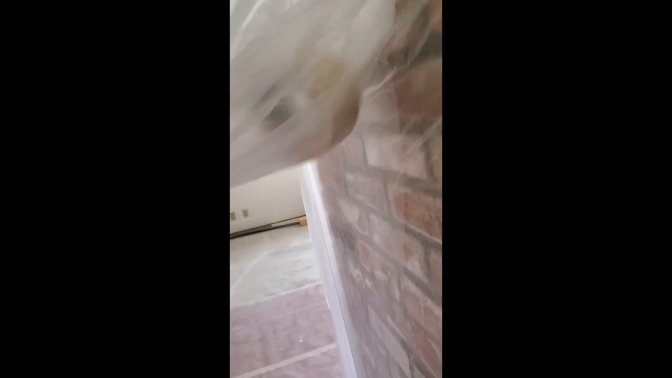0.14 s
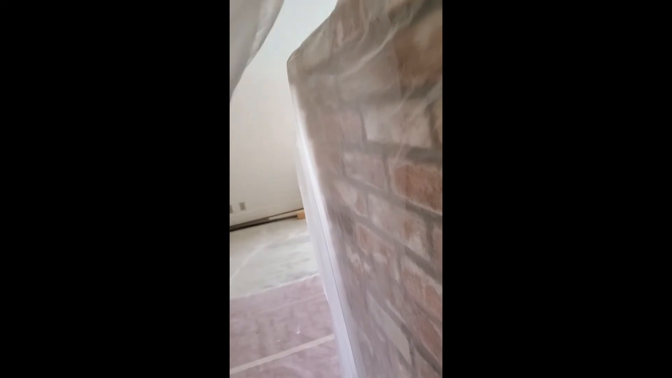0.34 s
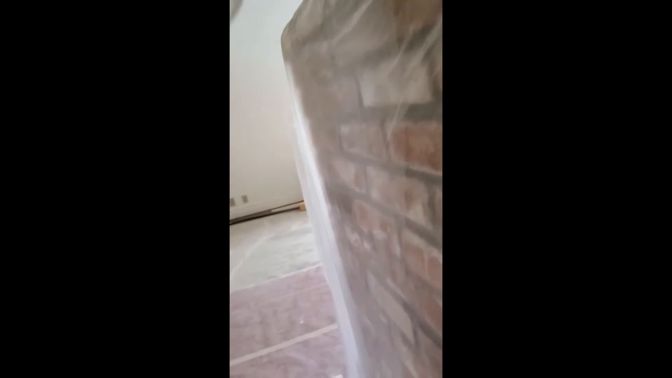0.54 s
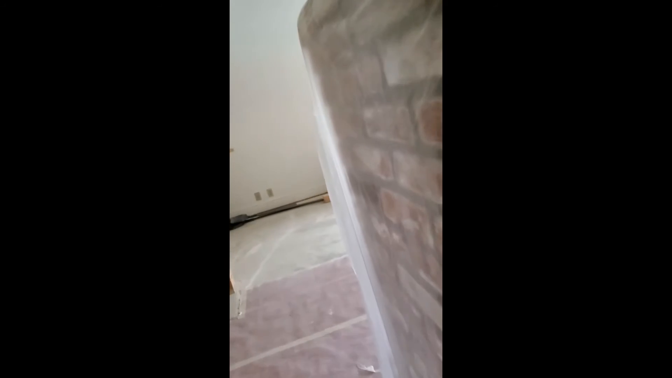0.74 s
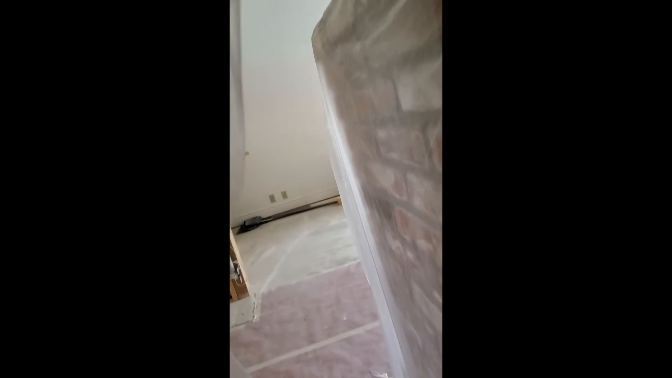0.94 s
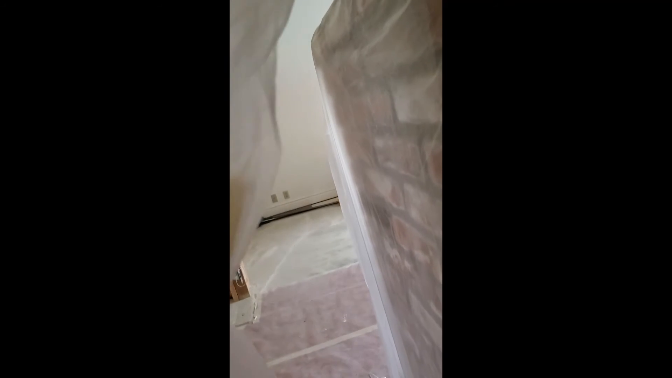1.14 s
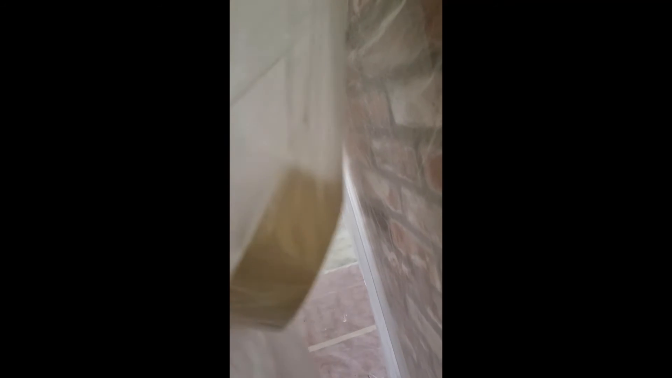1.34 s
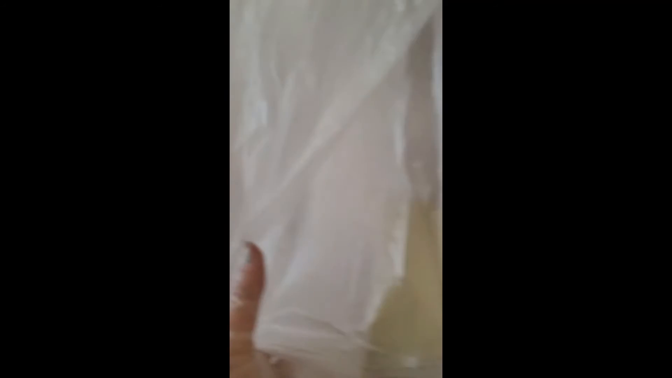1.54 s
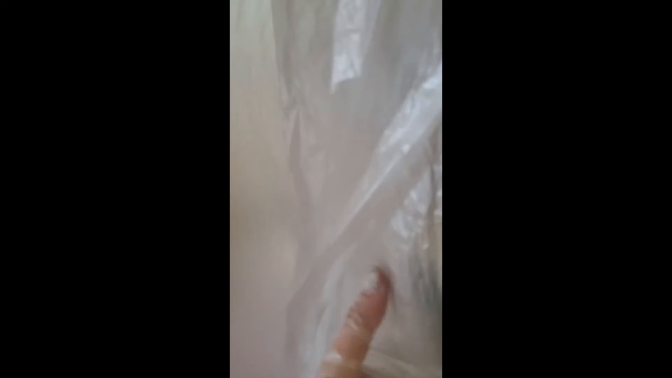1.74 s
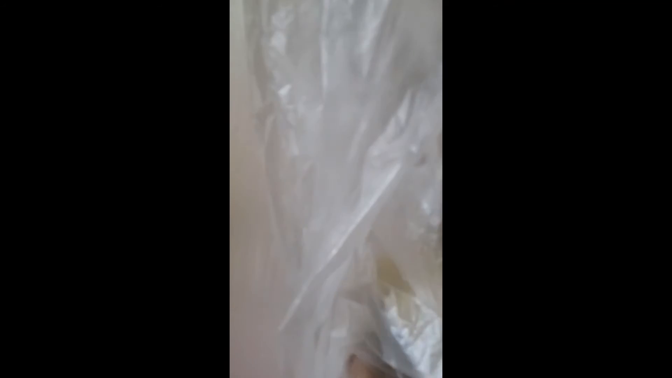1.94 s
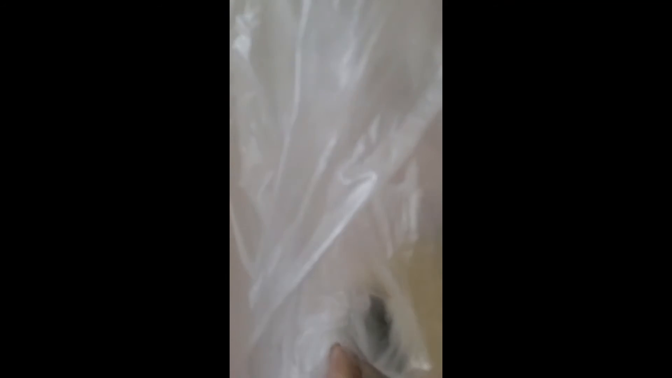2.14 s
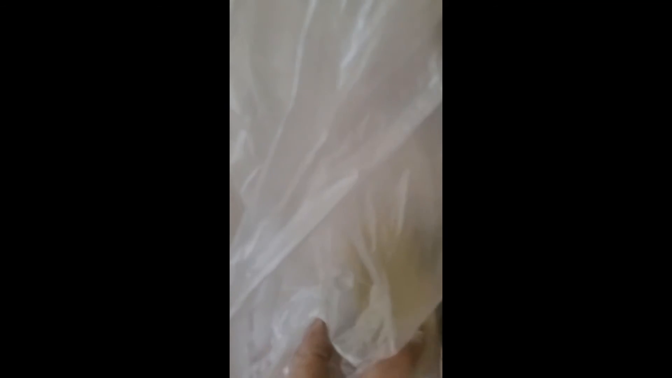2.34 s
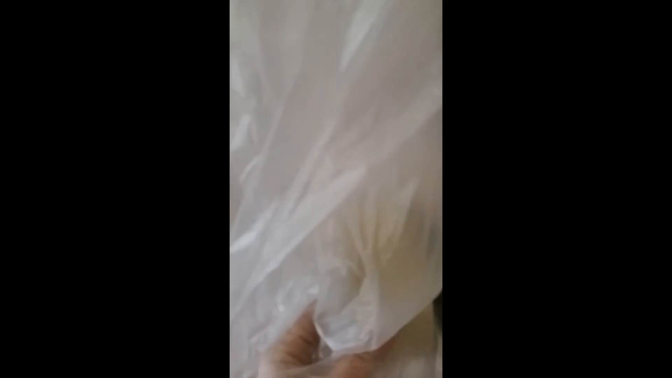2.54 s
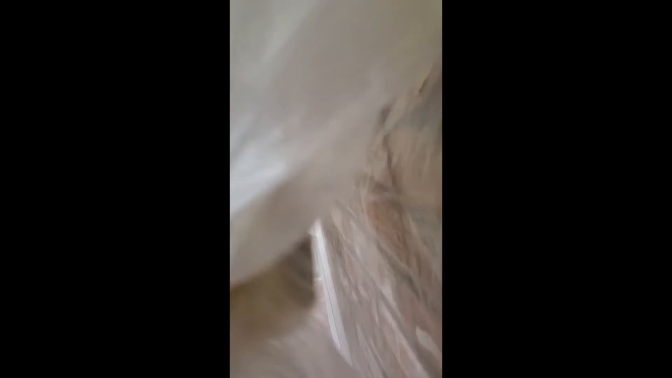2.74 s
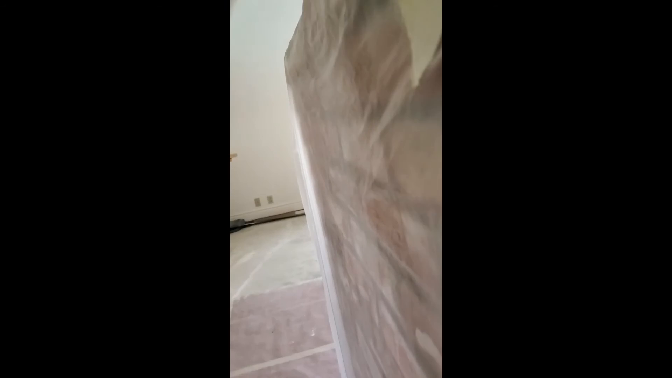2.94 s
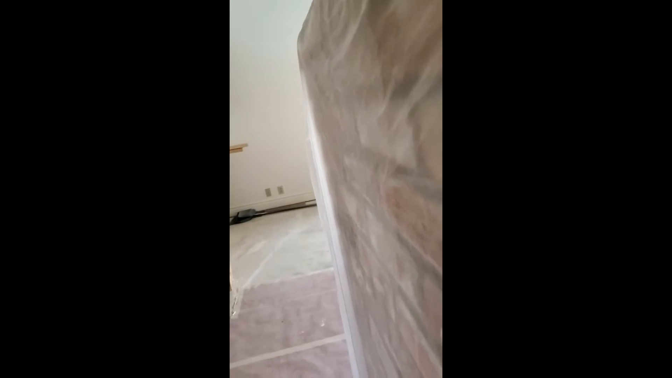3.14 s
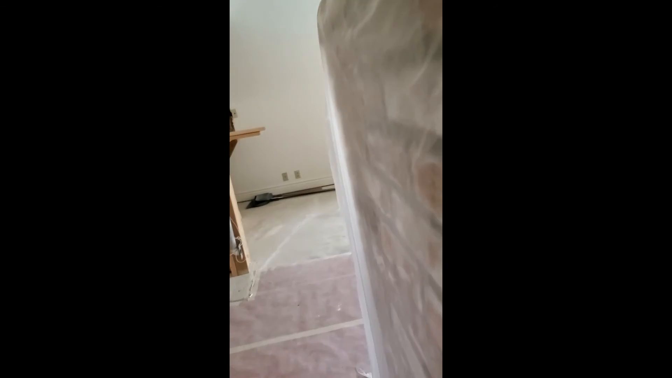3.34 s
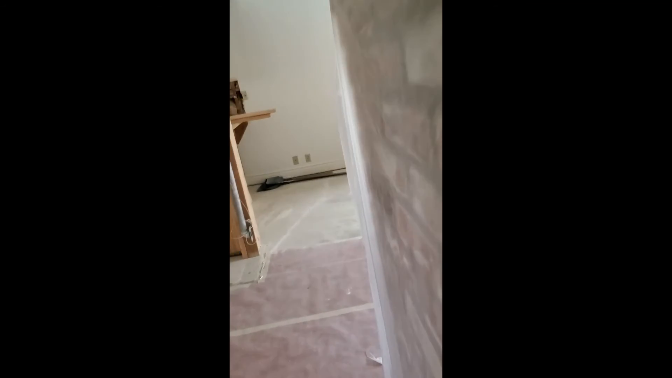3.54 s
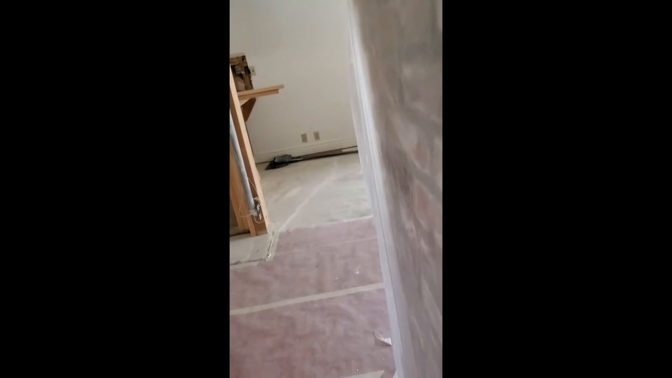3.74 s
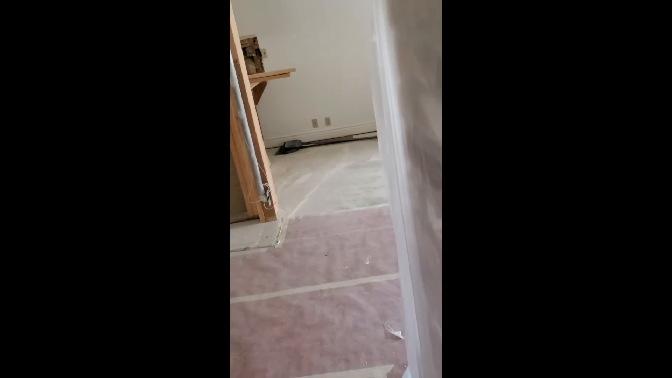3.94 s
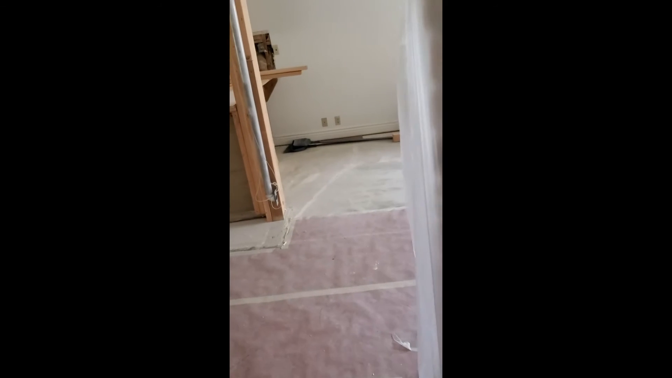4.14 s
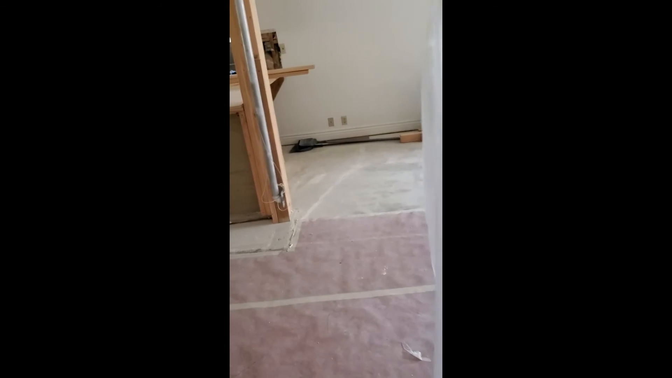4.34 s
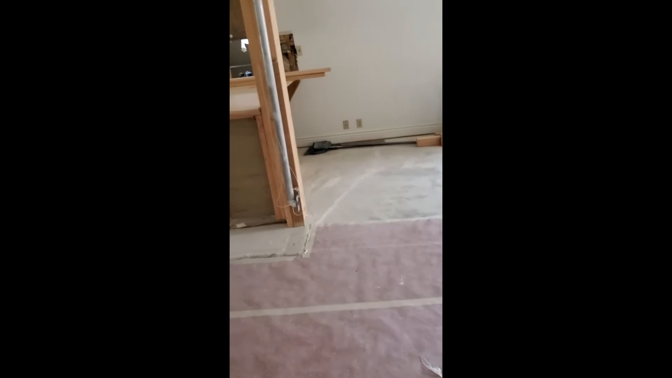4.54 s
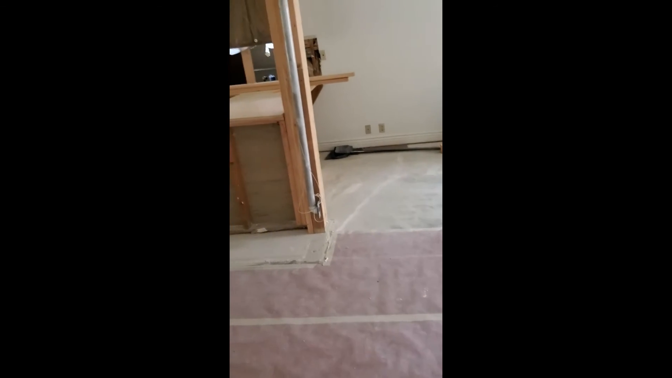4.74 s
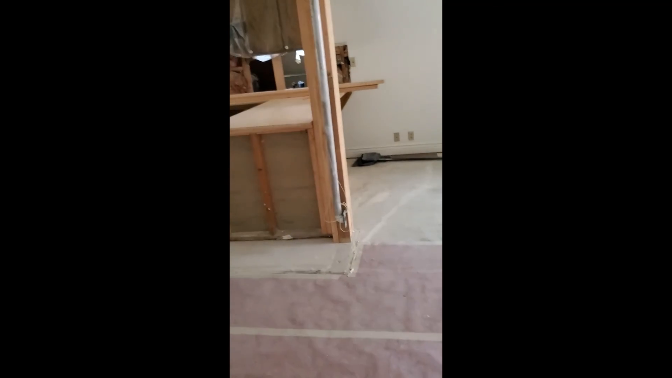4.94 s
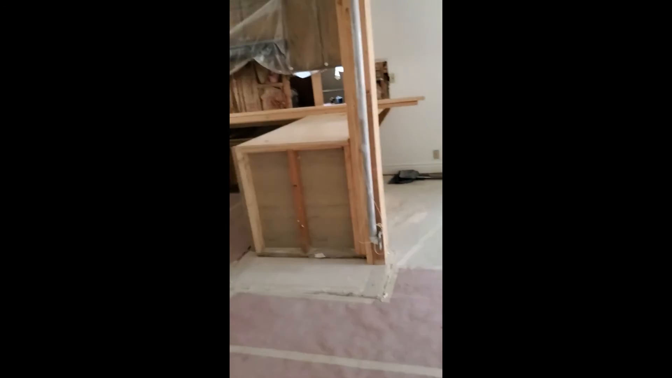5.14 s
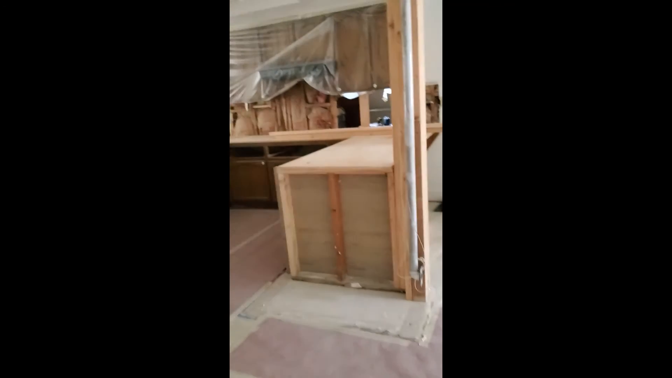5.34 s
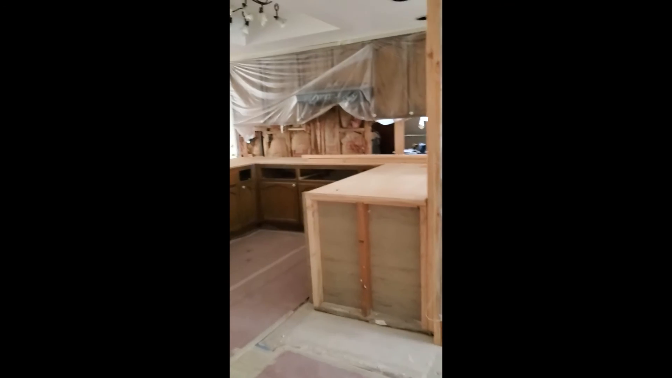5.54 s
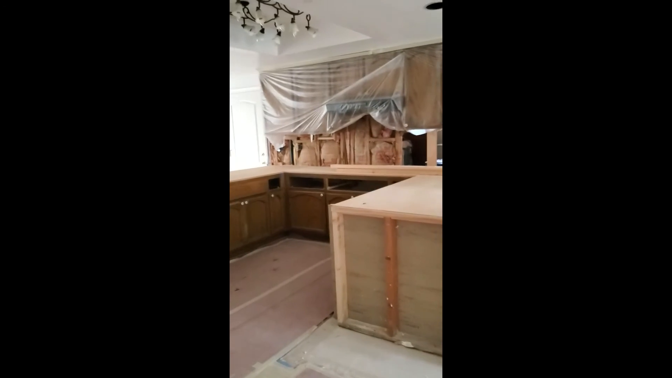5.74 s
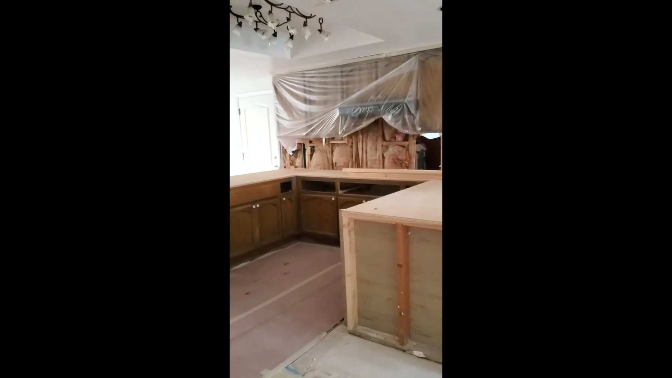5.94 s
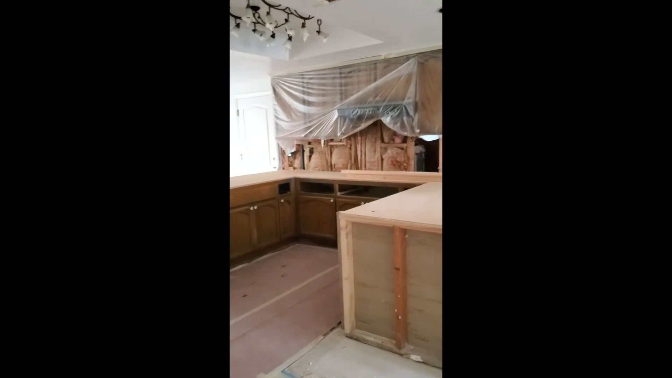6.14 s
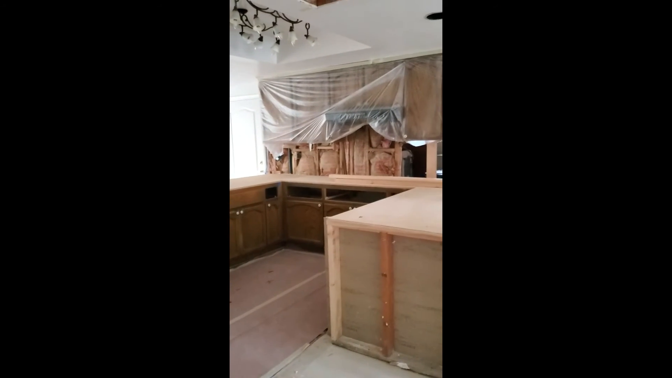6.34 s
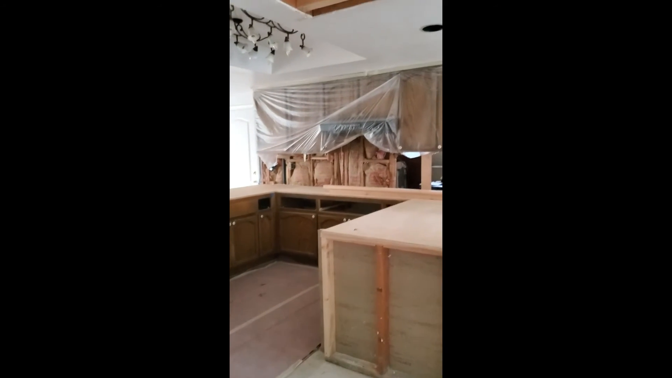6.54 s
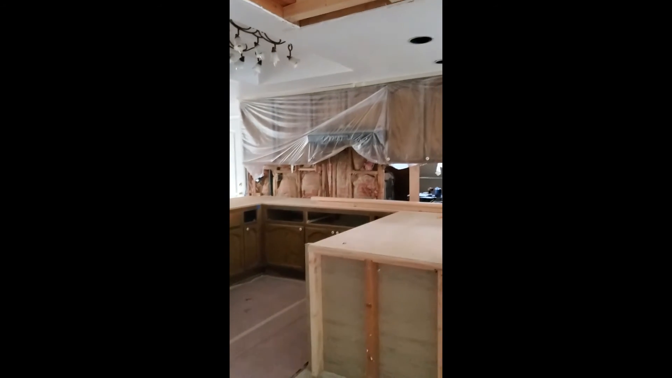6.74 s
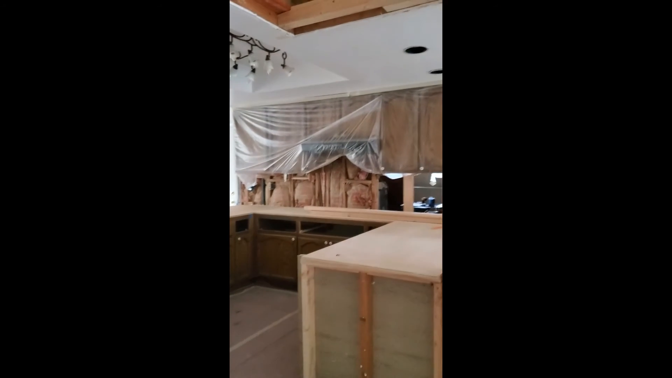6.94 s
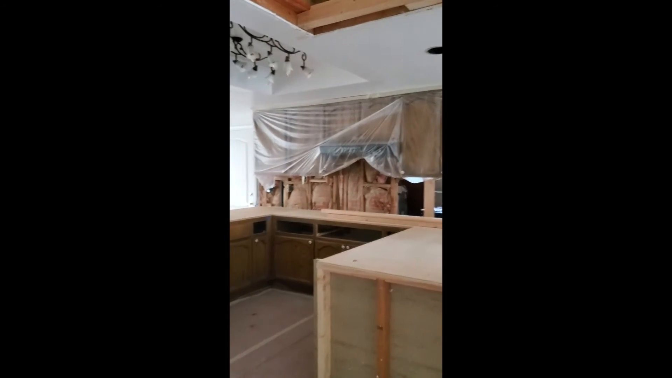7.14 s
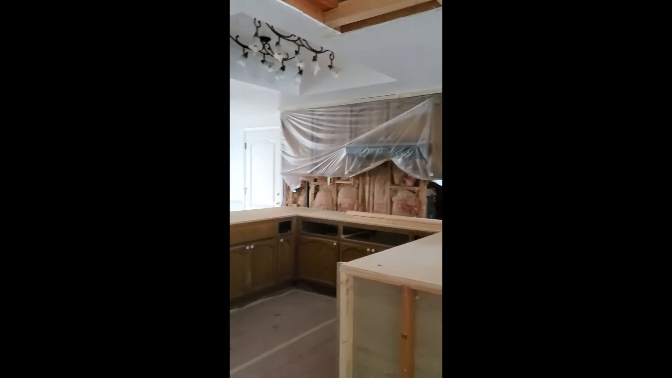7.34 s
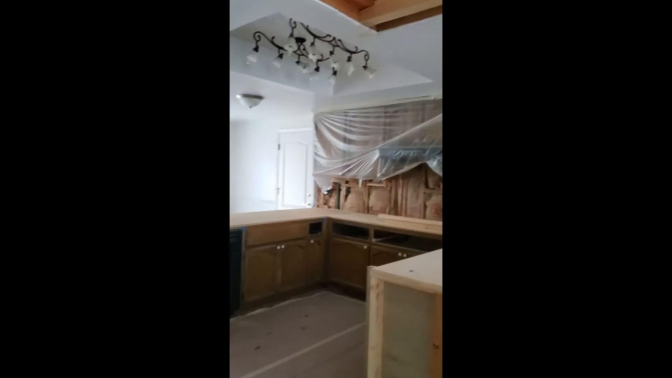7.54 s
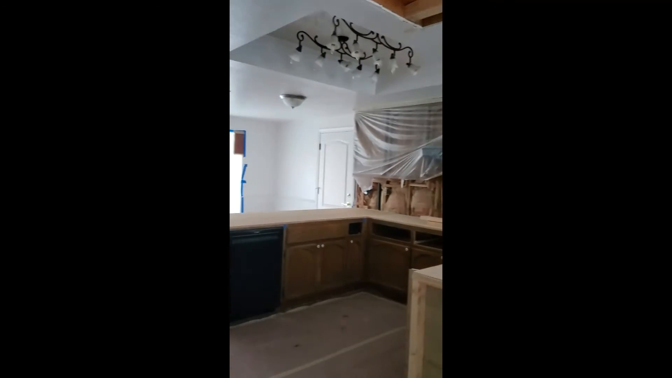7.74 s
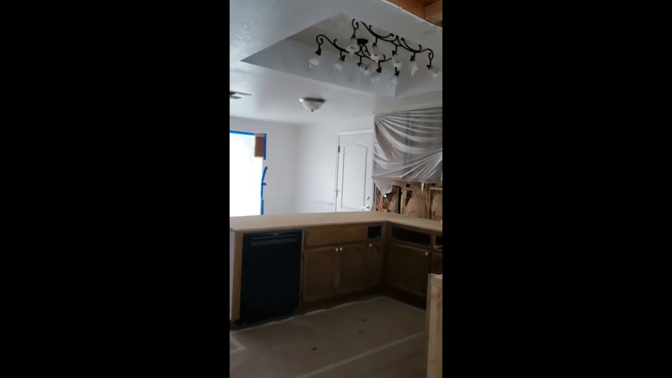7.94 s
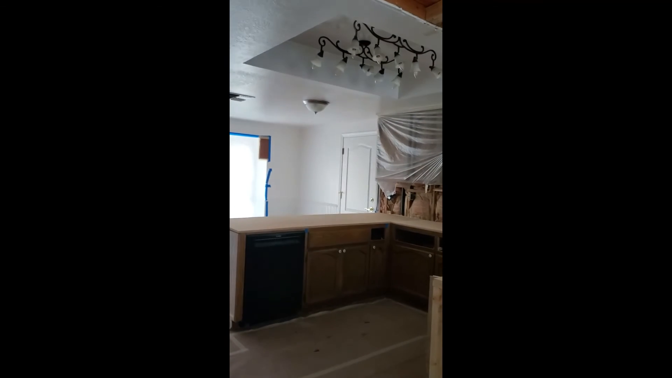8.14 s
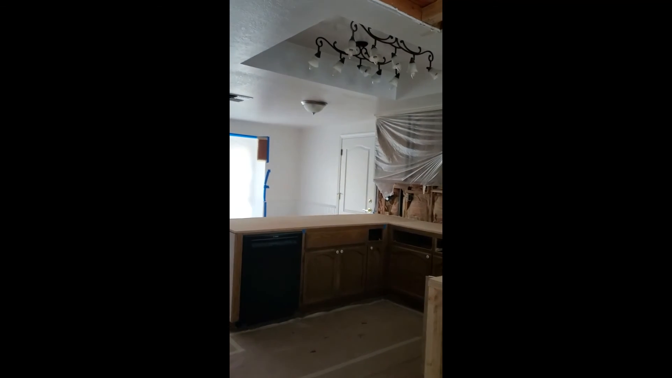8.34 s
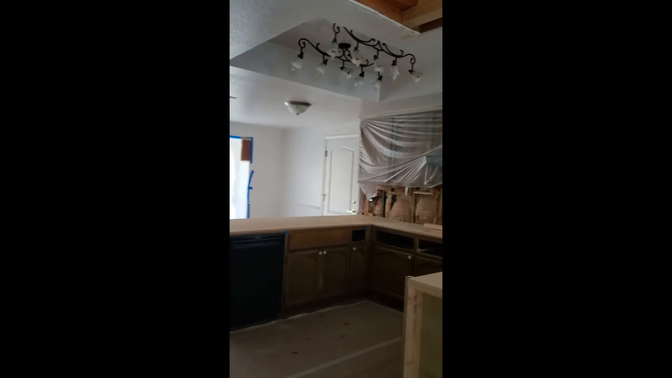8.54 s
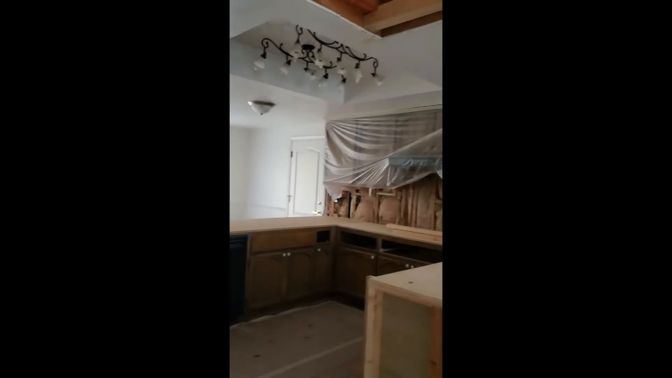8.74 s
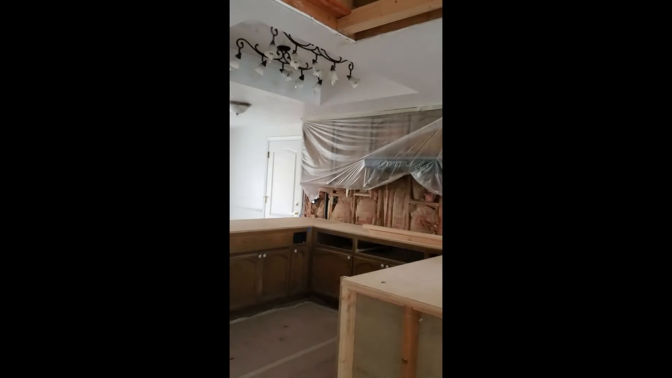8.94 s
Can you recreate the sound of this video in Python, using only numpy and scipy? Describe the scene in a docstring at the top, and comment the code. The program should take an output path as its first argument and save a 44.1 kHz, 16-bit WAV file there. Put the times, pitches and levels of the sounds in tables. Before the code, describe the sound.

Inside an empty house, with low wavering air noise and a faint mains hum, thin plastic film slides directly over a handheld phone. From 0 to 0.6 s it is loudest: bright, grainy hiss in quick strokes, buzzing folds and sharp crease snaps near 0.4 s, leaning right. Another swish and snap come around 1.3 s. At 1.7-1.8 s the sheet billows in soft low pats with muffled knocks; at 2.2-2.6 s it crumples, with sharp crackles near 2.3 s. A swish at 2.7-3 s ends as the film lifts, and its loose edge brushes quietly until about 4.7 s. A sleeve then rubs softly, with a knock and brief rattle at 5.2 s, knocks at 6.6 and 7.1 s, a small snap at 7.15 s and firmer rubs around 7.2 and 7.8-8.2 s. From 8.4 to 8.9 s, dull juddering scuffs and two knocks ring hollowly and echo.

```python
"""Someone pushes through thin plastic sheeting in an empty house, over low air noise and a faint mains hum.
The film slides over a handheld phone: tiny slips hiss in each port separately, folds buzz, creases snap
and the sheet billows, amid the first soft knocks and, at 2.27-2.33 s, sharp crackles of the crumpling sheet.
The film lifts, its loose edge passes, then a sleeve rubs the phone, with more soft knocks and a brief rattle.
Last, stick-slip scuffs set low modes ringing; knocks, crackles and scuffs echo in the bare rooms."""
import sys
import numpy as np
from scipy import signal
from scipy.fft import rfft, irfft
from scipy.io import wavfile
from scipy.ndimage import uniform_filter1d

SR = 44100
rng = np.random.default_rng(int(sys.argv[2]) if len(sys.argv) > 2 else 0)


def to_wav(s):
    """Save 16-bit WAV."""
    ch = np.atleast_2d(s).T  # columns
    pcm = np.round(np.clip(ch, -1, 1) * 32767)  # PCM
    wavfile.write(sys.argv[1], SR, pcm.astype(np.int16))


N = 397341
T = np.arange(N) / SR  # s
F = np.fft.rfftfreq(N, 1 / SR) + 1e-3  # Hz, kept above zero for logarithms
HALVES = np.array([[.5], [-.5]])  # splits a left-minus-right difference in dB between the ports
FILM_OFF_S, SHEET_OFF_S = 3.15, 4.72  # the film has lifted off the phone; the sheet is let go


def undb(db):
    """Decibel definition: amplitude gain is 10 ** (dB / 20)."""
    return 10 ** (np.asarray(db) / 20)


def curves(table):
    """Linear interpolation: each column of a table joined by straight lines in time."""
    s, *columns = np.transpose(table)
    return [np.interp(T, s, column) for column in columns]


def colour(points):
    """Spectral envelope: gain at every frequency from (Hz, dB) points on a logarithmic frequency axis."""
    hz, db = np.transpose(points)
    return undb(np.interp(np.log(F), np.log(hz), db))


def shape(x, gain):
    """Linear filtering: multiply the spectrum by a frequency response."""
    return irfft(rfft(x) * gain, N)


def resonance(hz, q):
    """Second-order resonance: band-pass response with gain 1 at the centre."""
    return 1 / (1 + 1j * q * (F / hz - hz / F))


def rms(x, band=(0, SR)):
    """Root-mean-square level of the centre of a stereo pair within a band in Hz."""
    return shape(x.mean(0), (F > band[0]) & (F < band[1])).std()


def walk(rate):
    """Slow random modulation: levels held 1 / rate s and smoothed twice; spread near 1."""
    hold = int(SR / rate)
    held = rng.standard_normal(N)[np.arange(N) // hold]
    return 1.68 * uniform_filter1d(uniform_filter1d(held, hold), hold)


def slips(rate, spread_db):
    """Shot noise of friction: random clicks in each port, exponentially spread in dB; rms 1."""
    size = undb(spread_db * np.minimum(rng.exponential(size=(2, N)), 4.5))
    happens = rng.random((2, N)) < rate / SR
    x = happens * size * rng.standard_normal((2, N))
    return x / x.std()


def blend(x, likeness, below_hz):
    """Spatial coherence: long waves reach both ports alike, short ones do not."""
    coherence = np.clip(likeness, 0, 1) / (1 + (F / below_hz) ** 4)
    mid = shape(x[0], np.sqrt(1 + coherence))
    side = shape(x[1], np.sqrt(1 - coherence))
    return np.array([mid + side, mid - side])


def waver(x, depth_db, rate):
    """Band-wise modulation: every half octave swells and sinks on its own, the lows most."""
    spectrum, out = rfft(x), 0
    centres = np.arange(12, 29) / 2  # log2 of Hz
    for octave, own in zip(centres, np.eye(len(centres))):
        band = irfft(spectrum * np.interp(np.log2(F), centres, own), N)
        depth = depth_db / (1 + 2 ** octave / 2500)
        out = out + band * undb(depth * walk(rate))
    return out


def movements(rows):
    """Power summation: (start_s, length_s, level_db) movements gather speed, hold, then run out."""
    power = 0
    for s, length, db in rows:
        attack = np.clip((T - s) / 0.011, 0, 1)
        release = np.exp(-np.clip((T - s - length) / 0.049, 0, 20))
        power = power + (undb(db) * attack * release) ** 2
    return power


def catches(rate, fade):
    """Stick and slip: uneven jerks start sharply and fade within a share of their cycle; rms 1."""
    phase = np.cumsum(rate * np.exp(.5 * walk(rate))) / SR % 1
    jerk = np.exp(-phase / fade)
    return jerk / np.sqrt(np.mean(jerk ** 2))


def mirrored(x, gain, delay_s):
    """Comb filtering: one echo from a nearby surface; as the gap changes, peaks and notches glide."""
    echo = np.array([np.interp(T - delay_s, T, side) for side in x])
    return (x + gain * echo) / np.hypot(1, gain)


# spectrum of the air in the house: pitch_hz [Hz], relative level_db [dB per Hz]
AIR_COLOUR = [(20, -19), (40, 0), (80, 3), (150, -15), (350, -4.5), (600, -9), (1200, -6), (4000, -15.5),
              (15000, -15)]
AIR_DB, HUM_HZ, HUM_DB = -56, 59.5, -66.5


def house():
    """Broadband and tonal background: low, wavering air noise and a sinusoidal mains hum."""
    air = shape(blend(rng.standard_normal((2, N)), 0.96, 610), colour(AIR_COLOUR))
    air = waver(air / rms(air), depth_db=2.0, rate=8)
    hum = np.sqrt(2) * np.sin(2 * np.pi * HUM_HZ * T)
    return air * undb(AIR_DB) + undb(HUM_DB) * hum


# steady drag over the phone: start_s [s], hiss level_db [dB]
DRAG_LEVEL = [(0, -31), (0.62, -32.5), (1.2, -32), (2.15, -33.5), (2.55, -34), (3.38, -37), (3.62, -41),
              (4.1, -41), (4.28, -44), (4.65, -44.5), (5.3, -39.5), (6.35, -42.0), (7.7, -41), (8.5, -44),
              (8.75, -45.0), (8.97, -57)]
# quicker strokes of film or sleeve on top: start_s [s], length_s [s], hiss level_db [dB]
QUICK_STROKES = [(.08, 0.36, -27.5), (.29, 0.073, -26.5), (.48, 0.096, -31.5), (1.28, 0.075, -32),
                 (2.26, 0.16, -33.5), (2.40, 0.031, -34), (2.68, 0.29, -32.5), (2.77, 0.085, -31.5),
                 (4.18, 0.042, -40), (4.32, 0.052, -43), (4.92, .25, -48.5), (5.4, 0.45, -44.5),
                 (5.81, 0.025, -43), (6.905, 0.18, -43), (7.18, 0.18, -39), (7.84, 0.44, -39),
                 (8.15, 0.052, -36), (8.6, 0.049, -43.5)]


def sliding():
    """Power summation: hiss level in dB of the steady drag plus the strokes."""
    return 10 * np.log10(undb(curves(DRAG_LEVEL)[0]) ** 2 + movements(QUICK_STROKES))


# resonances of the right port: pitch_hz [Hz], width_hz [Hz], level_db [dB]
RIGHT_PORT_RESONANCES = [(1860, 1640, 5.5), (2700, 560, -5), (3330, 230, 0.5), (7640, 730, -2.5),
                         (14640, 4600, 5.5)]
RIGHT_PORT_DB, LEFT_NULL_HZ, LEFT_NULL_WIDTH_HZ = 2, 7230, 1100


def ports():
    """Duct cancellation and resonance: a null in the left port, several broad peaks and dips in the right."""
    left = 1 - resonance(LEFT_NULL_HZ, LEFT_NULL_HZ / LEFT_NULL_WIDTH_HZ)
    right_db = RIGHT_PORT_DB
    for hz, width, db in RIGHT_PORT_RESONANCES:
        right_db = right_db + db * np.exp(-2 * ((F - hz) / width) ** 2)
    return np.array([left * np.abs(left) ** .4, undb(right_db)])


# spectra of the pressed film, its trailing loose edge and the sleeve: pitch_hz [Hz], level_db [dB]
FILM_COLOUR = [(100, -9), (480, -12), (900, -4), (1500, -3), (2700, -1), (3500, 3), (4600, 1), (6500, -2),
               (9000, -0.5), (15500, -3.5)]
EDGE_COLOUR = [(100, -8), (350, -7.5), (700, -9.5), (1100, -7.5), (1900, -2.5), (3500, 0), (5500, 0),
               (9000, -0.5), (15500, -2.5)]
SLEEVE_COLOUR = [(100, -9.5), (280, -7.5), (600, -3.5), (930, -4), (1400, -2.5), (2000, 0.5), (2700, 1),
                 (3500, 1), (5200, 1.5), (7500, -1.5), (9000, 0.5), (15500, -3)]
# which port is rubbed harder: start_s [s], left minus right pan_db [dB]
PORT_TILT = [(0.0, -4), (0.43, -1.5), (0.68, -6), (1.15, -6.0), (1.36, 0), (2.21, -4.5), (3.99, -3),
             (4.12, -7), (4.84, -4), (4.99, -6), (7.95, -0.5), (9.01, -4.5)]
PORTS_PAN_DB = -4  # left minus right when both ports are rubbed alike
FILM_BODY_DB, SLEEVE_BODY_DB = -3.5, -2.5  # body of the rustle relative to its hiss, in a gentle slide
GENTLE_DB = -40  # hiss level of a gentle slide
THINNING = 0.31  # dB of body lost per dB of hiss: quicker sliding is brighter
FILM_ECHO, FILM_ECHO_S = 0.18, 0.00061  # gain of the film's echo of its own hiss; middle delay


def rubbing(hiss_db, pressed):
    """Sliding friction: film, loose edge, then sleeve hiss with tiny slips; sparser crinkles in film and sleeve."""
    film = slips(32000, spread_db=1.0) + undb(-18.5) * slips(900, spread_db=3.5)
    film = mirrored(film, FILM_ECHO, FILM_ECHO_S * np.exp(0.444 * walk(6)))
    edge = slips(30000, spread_db=.5)
    sleeve = slips(30000, spread_db=.5) + undb(-16.5) * slips(500, spread_db=-3.5)
    clear = np.clip((T - SHEET_OFF_S) / .5, 0, 1)  # the phone comes clear of the sheet
    touches = [(film, FILM_COLOUR, pressed),
               (edge, EDGE_COLOUR, (1 - pressed) * (1 - clear)),
               (sleeve, SLEEVE_COLOUR, clear)]
    port = ports()
    x = sum(shape(clicks, colour(points) * port) * np.sqrt(share) for clicks, points, share in touches)
    x = waver(x, depth_db=2.0, rate=26)  # each passing fold has its own colour

    body = shape(x, 1 / (1 + (F / 6800) ** 6))
    hiss = (x - body) / rms(x, (5000, 15500))
    body = body / rms(x, (1200, 6000))
    body_db = FILM_BODY_DB * (1 - clear) + SLEEVE_BODY_DB * clear
    body_db = body_db - THINNING * (hiss_db - GENTLE_DB)
    sides_db = HALVES * (curves(PORT_TILT)[0] - PORTS_PAN_DB)
    # the contact catches and lets go, most while the film is pressed on
    grip_db = (.35 + .1 * pressed) * np.array([walk(70), walk(70)])
    rustle = hiss * undb(sides_db) + body * undb(body_db + 0.19 * sides_db)
    return undb(hiss_db + grip_db) * rustle


# spectrum of the billowing sheet: pitch_hz [Hz], level_db [dB]
BILLOW_SPECTRUM = [(22, -28), (42, 0), (100, 1.5), (190, -1), (330, -0.5), (650, -6), (1300, -12),
                   (5000, -48)]
# the hand pushes into the sheet: start_s [s], length_s [s], billow_db [dB], crumple_db [dB]
HAND_PUSHES = [(0.278, 0.14, -66, -64), (1.66, 0.067, -48, -64), (1.787, 0.27, -52, -51),
               (2.232, 0.25, -58, -44.5), (2.528, 0.25, -53.5, -47.5), (4.304, 0.098, -59.5, -57)]
BILLOW_DB, CRUMPLE_DB = -26, -25.5  # the sliding sheet, relative to its hiss


def sheet(hiss_db, pressed):
    """Membrane motion and buckling: soft billowing pats and crumpling as it slides and at each push."""
    billow = shape(blend(slips(900, spread_db=0.0), 0.93, 900), colour(BILLOW_SPECTRUM))
    billow = waver(billow / rms(billow), depth_db=5.0, rate=12)
    crumple = blend(slips(900, spread_db=1.5), 0.8, 1300) * catches(110, fade=0.56)
    crumple = shape(crumple, resonance(910, 0.9) ** 2)
    held = np.clip((SHEET_OFF_S - T) / 0.45, 0, 1)
    billowing = held * undb(hiss_db + BILLOW_DB) ** 2
    billowing = billowing + movements((s, length, db) for s, length, db, _ in HAND_PUSHES)
    crumpling = pressed * undb(hiss_db + CRUMPLE_DB) ** 2
    crumpling = crumpling + movements((s, length, db) for s, length, _, db in HAND_PUSHES)
    return billow * np.sqrt(billowing) + crumple / rms(crumple) * np.sqrt(crumpling)


# folds buzzing as they drag past: start_s [s], length_s [s], level_db before panning [dB], pitch_hz [Hz]
BUZZING_FOLDS = [(0.095, 0.077, -39, 4160), (0.328, .05, -40.5, 2940), (0.497, 0.036, -46, 3800),
                 (2.4, .06, -42.5, 3560), (2.423, .025, -43, 1700), (2.813, 0.039, -51, 1900),
                 (7.14, 0.11, -46, 1930)]
FOLD_Q, FOLD_PAN_DB = 1.64, 4  # pan is left minus right


def folds():
    """Stick-slip excitation of a resonance: a taut fold jerks past and buzzes at a pitch of its own."""
    grains = rfft(slips(9000, spread_db=0.0) * catches(170, fade=0.31))
    out = 0
    for s, length, db, hz in BUZZING_FOLDS:
        x = irfft(grains * resonance(hz, FOLD_Q) ** 2, N)
        out = out + x / x.mean(0).std() * np.sqrt(movements([(s, length, db)]))
    return out * undb(FOLD_PAN_DB * HALVES)


# creases snapping through, before the ports filter them:
# start_s [s], peak level_db before panning [dB], left minus right pan_db [dB]
CREASE_SNAPS = [(0.365, -21, -4), (0.414, -31, -3), (0.449, -22, -2), (1.365, -23, -2), (1.827, -25, -3),
                (2.44, -23, -3), (2.569, -25, -3), (2.818, -29, -12), (7.155, -19, -2)]


def snaps():
    """Snap-through buckling: a crease flips over with a noise burst of a millisecond or two."""
    out, t = np.zeros((2, N)), T[:SR // 50]
    for s, db, pan_db in CREASE_SNAPS:
        burst = rng.standard_normal((2, len(t))) * undb(-60 * t / 0.0046)
        add(out, s, burst / np.abs(burst).max() * undb(db + pan_db * HALVES))
    return shape(out, ports())


def add(track, s, sound):
    """Superposition: add a sound to a track at a time."""
    part = track[..., int(s * SR):int(s * SR) + sound.shape[-1]]
    part += sound[..., :part.shape[-1]]


def ring(hz, decay_s):
    """Damped mode with a soft onset, peak 1: the air hears its velocity; its exponential loses 120 dB in decay_s."""
    t = T[:SR // 5]
    x = np.gradient(np.sin(2 * np.pi * hz * t) * t ** 2 * undb(-120 * t / decay_s))
    return x / np.abs(x).max()


# soft knocks, and at 2.27-2.33 s (rows 2.266, 2.285, 2.330) sharp crackles of the crumpling sheet:
# start_s [s], main mode peak level_db before the ports [dB], pitch_hz [Hz], decay_s [s],
# second_db relative to the main mode [dB], second_hz [Hz], room_db relative to the direct sound [dB]
KNOCKS_AND_CRACKLES = [(1.6715, -19, 370, .0036, -17, 1300, -12), (1.826, -21.5, 520, .003, 0, 1300, -6),
                       (2.211, -33, 330, .007, -16, 1200, -9), (2.260, -33, 210, .01, 0, 1100, -8),
                       (2.266, -26, 1050, .007, -14, 1800, -5), (2.285, -24, 900, .004, -10, 1400, -8),
                       (2.330, -27, 750, .007, -1, 1400, -8), (2.568, -23, 330, .0055, 1, 1050, -4),
                       (5.181, -20.5, 280, .0052, 3, 1750, -5), (6.128, -43, 130, .03, -30, 1500, -6),
                       (6.620, -22.5, 560, .0075, 1, 1300, -2.5), (7.105, -32, 390, .009, -10, 1400, -5),
                       (8.626, -24, 800, .0035, -8, 1200, -4), (8.726, -27, 1130, .012, -20, 1500, -6)]
SECOND_DECAY_S, PORT_LAG_S = .0022, .0005


def knocks_and_crackles():
    """Impulsive excitation: each knock or crackle is two damped modes; returns direct sound and room feed."""
    direct, sent = rattle(), np.zeros(N)
    for s, db, hz, decay_s, second_db, second_hz, room_db in KNOCKS_AND_CRACKLES:
        second = undb(second_db) * ring(second_hz, SECOND_DECAY_S)
        pulse = undb(db) * (ring(hz, decay_s) + second)
        add(direct, s, pulse)
        add(sent, s, pulse * undb(room_db))
    # the left port lies further off, in the shade of the phone
    left = shape(direct, np.exp(-2j * np.pi * F * PORT_LAG_S) / np.sqrt(1 + (F / 1100) ** 2))
    return np.array([left, undb(1.0) * direct]), sent


# spectrum of the room's answer: pitch_hz [Hz], level_db [dB]
ROOM_COLOUR = [(60, -2), (230, 7.5), (480, 1.5), (650, 6.5), (950, 4.5), (2000, 7), (5000, -12),
               (15000, -24)]
ROOM_T60_S, EARLY_T60_S, EARLY_DB = 1, .07, 0


def room(x):
    """Reverberation: near surfaces answer first, then a dense, fading tail, different at each port."""
    fade = undb(-60 * T / ROOM_T60_S) + undb(EARLY_DB - 60 * T / EARLY_T60_S)
    tail = blend(rng.standard_normal((2, N)) * fade * (T > .003), .65, 420)
    energy = (tail ** 2).sum(1, keepdims=True)
    tail = shape(tail / np.sqrt(energy), colour(ROOM_COLOUR))
    return signal.fftconvolve(x[None], tail[:, :SR], axes=1)[:, :N]


RATTLE_S, RATTLE_HZ, RATTLE_DB, RATTLE_T60_S = 5.186, 2130, -41, .35  # level at onset, before the ports


def rattle():
    """Repeated loose contact: resonant noise chatters just after a knock and settles exponentially."""
    x = shape(rng.standard_normal(N) * catches(60, fade=0.26), resonance(RATTLE_HZ, 4.2) ** 2)
    settling = undb(RATTLE_DB - 60 * np.abs(T - RATTLE_S) / RATTLE_T60_S)
    return x / x.std() * (T > RATTLE_S) * settling


# scuffs: start_s [s], length_s [s], level_db before the stroke envelope [dB], pitch_hz [Hz]
SCUFF_STROKES = [(8.395, 0.075, -48, 225), (8.485, 0.072, -50, 104), (8.622, 0.028, -36.5, 650),
                 (8.625, 0.19, -53.5, 1000), (8.634, 0.046, -34, 367), (8.64, 0.24, -50.5, 111),
                 (8.676, 0.059, -36.5, 616), (8.728, 0.074, -37, 424), (8.792, .07, -40, 494)]
CATCHES_PER_S = 95


def scuffs():
    """Stick-slip friction: short strokes, each through one broad, dull resonance."""
    grains = blend(slips(2500, spread_db=0.5), 0.84, 1500) * catches(CATCHES_PER_S, fade=1)
    grains = shape(grains, 1 / np.sqrt(1 + (F / 1500) ** 8))
    out = 0
    for s, length, db, hz in SCUFF_STROKES:
        x = shape(grains, resonance(hz, 1.6) / np.sqrt(1 + (F / (3 * hz)) ** 4))
        progress = np.clip((T - s) / length, 0, 1)
        stroke = np.sqrt(np.minimum(4 * progress, 1) * (1 - progress ** 2))  # bites, then eases off
        out = out + x / rms(x) * undb(db) * stroke
    return out


# modes of the hollow thing that is scuffed: pitch_hz [Hz], level_db at unit energy [dB], t60_s [s]
HOLLOW_MODES = [(478, -23, .45), (545, -28, .3), (1100, -19, .3)]


def hollow(x):
    """Modal response: the scuffed thing rings on in a few low modes."""
    t, response = T[:SR], 0
    for hz, db, t60 in HOLLOW_MODES:
        mode = np.sin(2 * np.pi * hz * t) * undb(-60 * t / t60)
        response = response + mode / np.linalg.norm(mode) * undb(db)
    return signal.fftconvolve(x, response[None], axes=1)[:, :N]


def scene():
    """Superposition: rubbing at the ports, sheet, knocks and crackles close by, the rooms around them."""
    hiss_db = sliding()
    pressed = np.clip((FILM_OFF_S - T) / 0.45, 0, 1)  # the film lies right on the phone
    plastic = rubbing(hiss_db, pressed) + sheet(hiss_db, pressed) + folds() + snaps()
    pulses, sent = knocks_and_crackles()
    scrape = scuffs()
    echoes = room(sent + undb(-7.5) * scrape.mean(0))
    return house() + plastic + pulses + scrape + hollow(scrape) + echoes


def record(dry):
    """Band limiting: the phone cuts the top steeply with an elliptic low-pass at 15700 Hz."""
    return signal.sosfilt(signal.ellip(12, .2, 80, 15700, fs=SR, output="sos"), dry)


dry = scene()
out = record(dry)
to_wav(out)
```